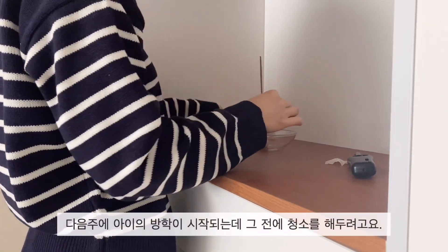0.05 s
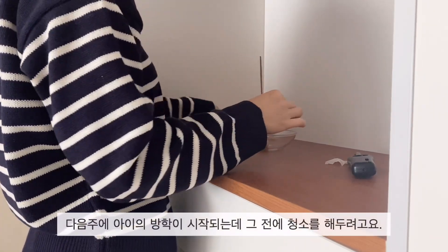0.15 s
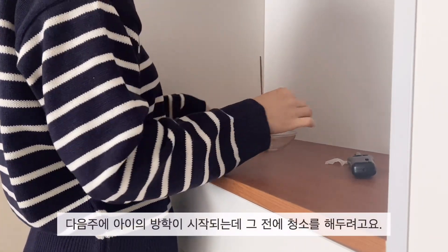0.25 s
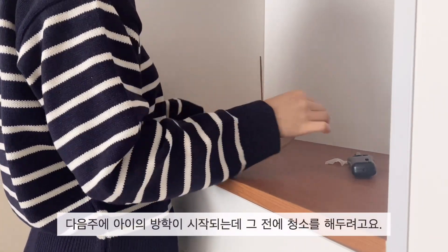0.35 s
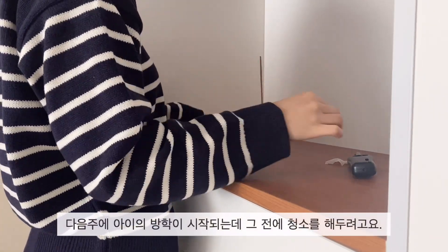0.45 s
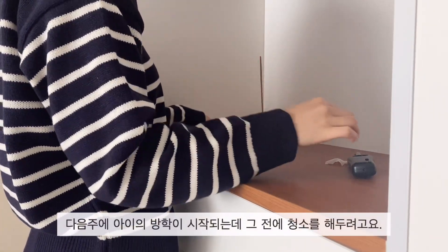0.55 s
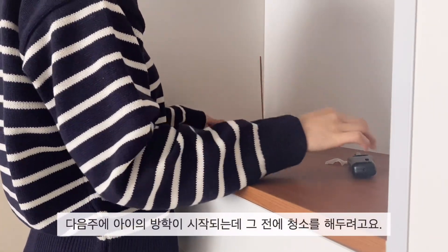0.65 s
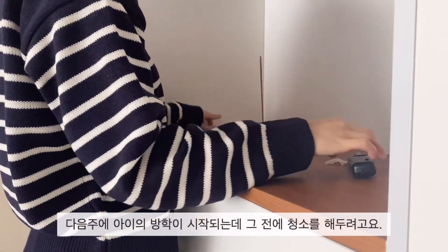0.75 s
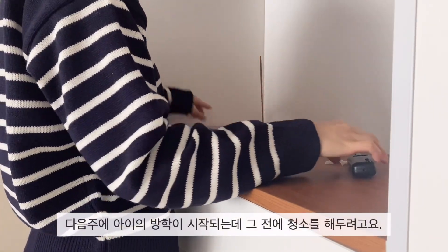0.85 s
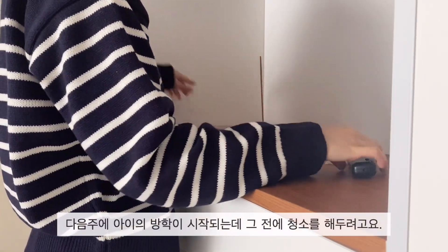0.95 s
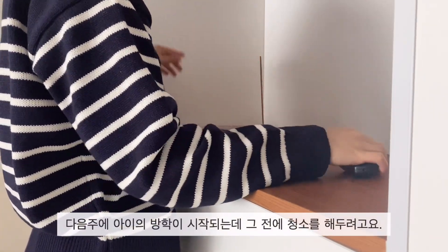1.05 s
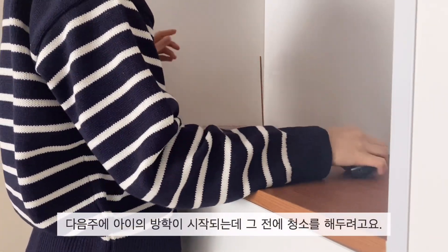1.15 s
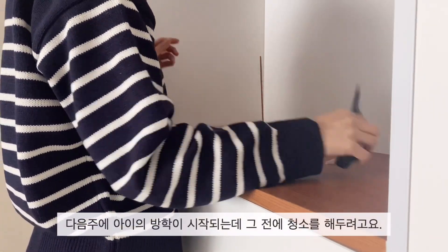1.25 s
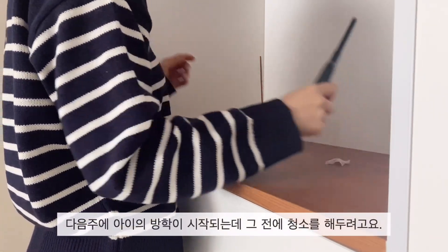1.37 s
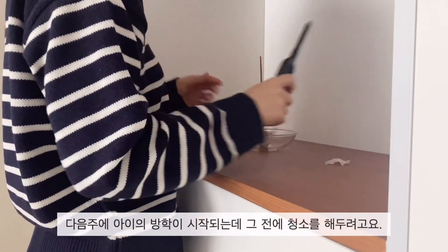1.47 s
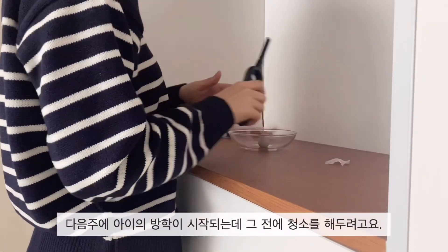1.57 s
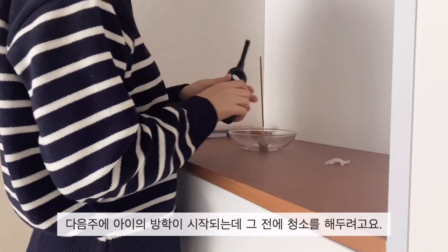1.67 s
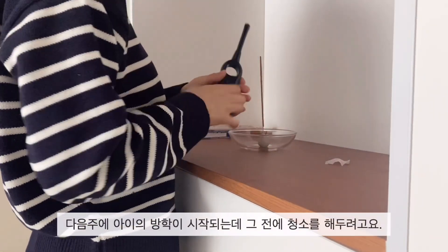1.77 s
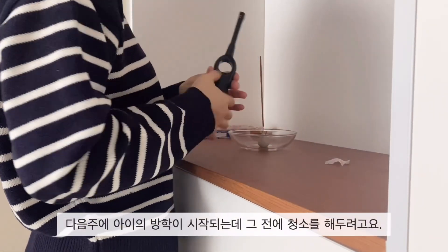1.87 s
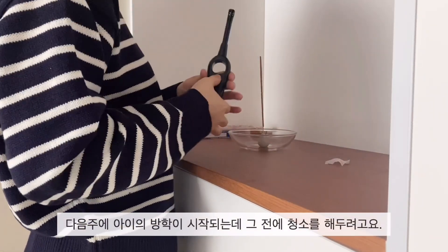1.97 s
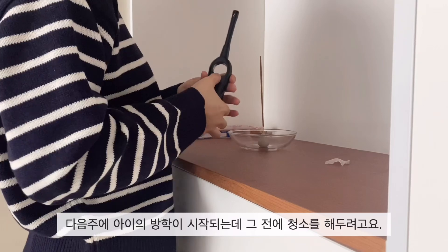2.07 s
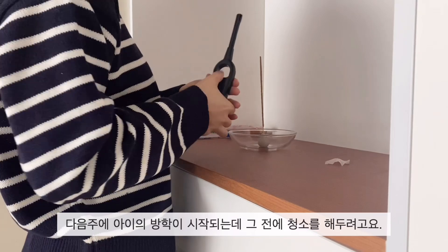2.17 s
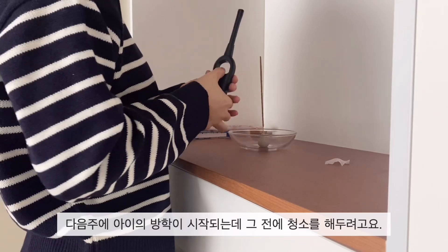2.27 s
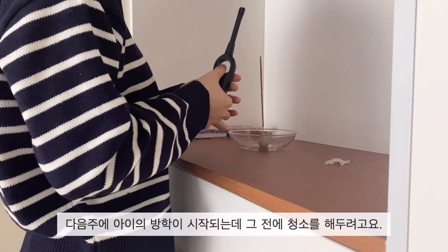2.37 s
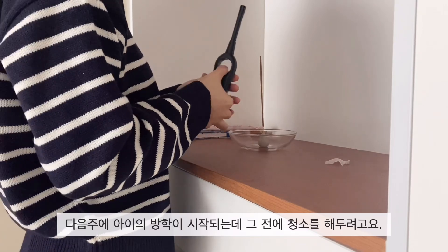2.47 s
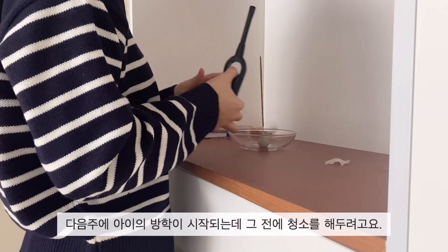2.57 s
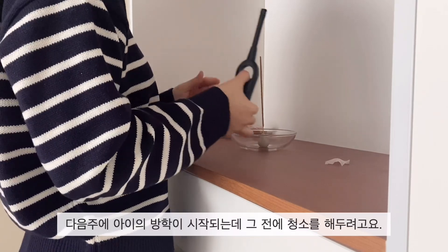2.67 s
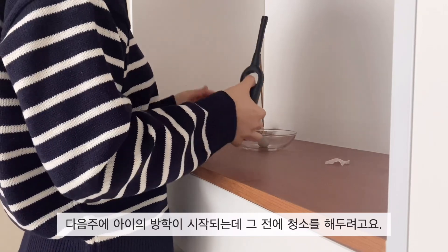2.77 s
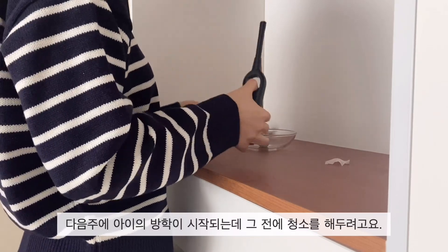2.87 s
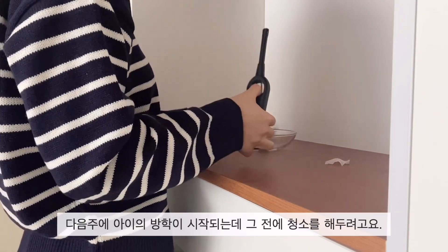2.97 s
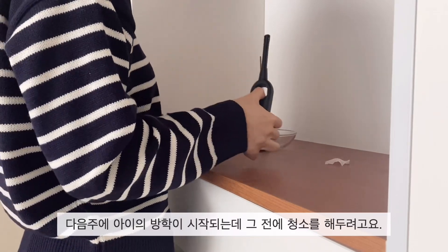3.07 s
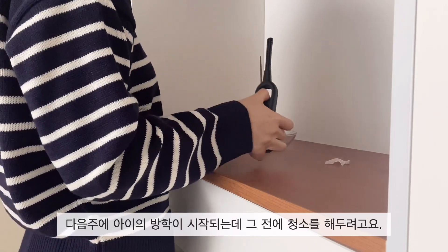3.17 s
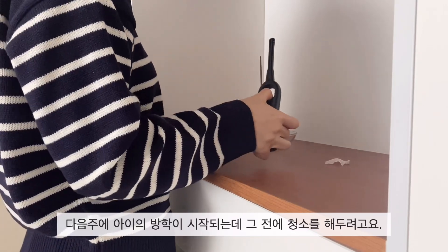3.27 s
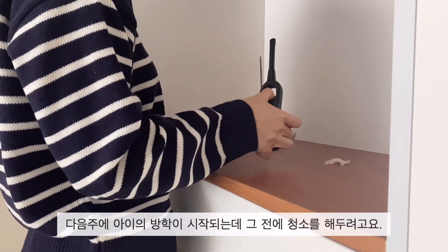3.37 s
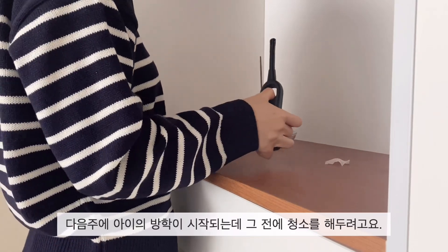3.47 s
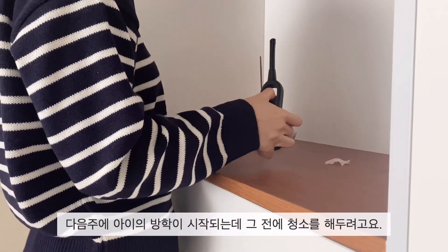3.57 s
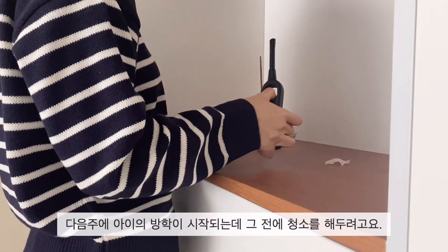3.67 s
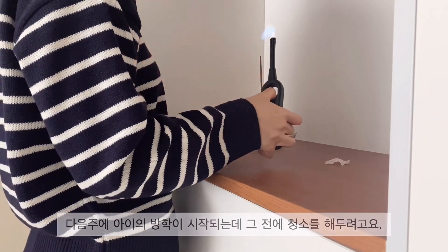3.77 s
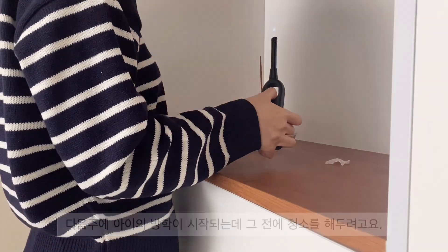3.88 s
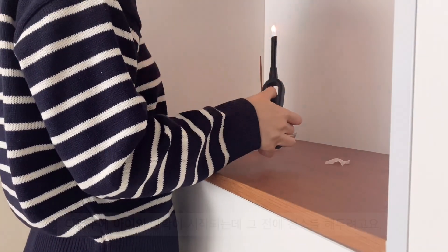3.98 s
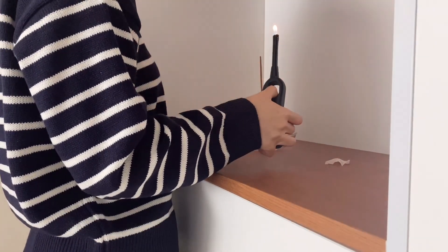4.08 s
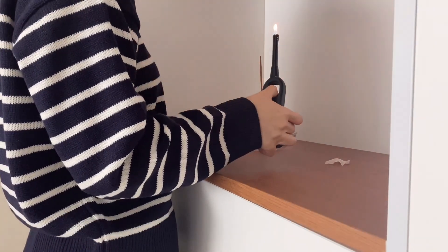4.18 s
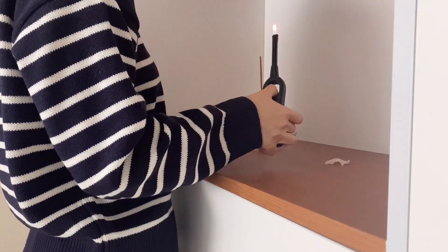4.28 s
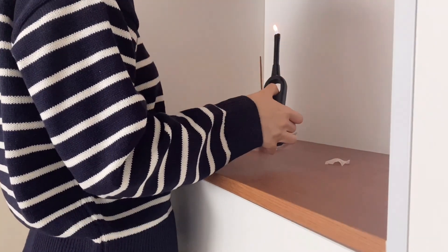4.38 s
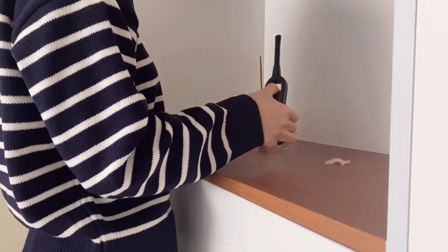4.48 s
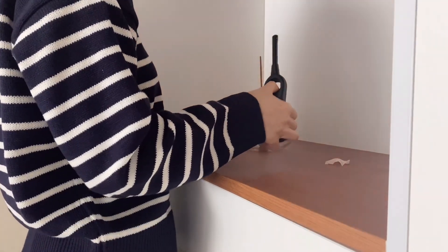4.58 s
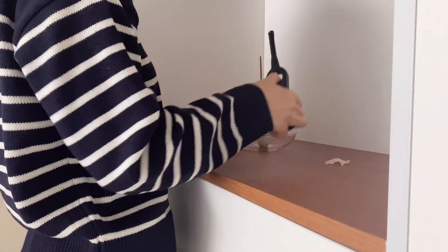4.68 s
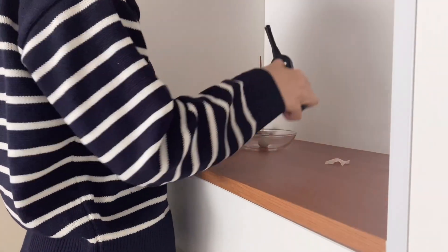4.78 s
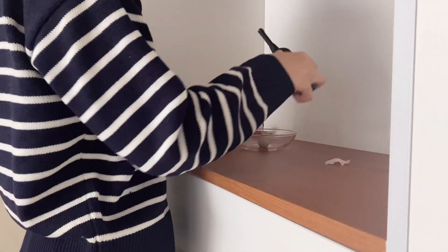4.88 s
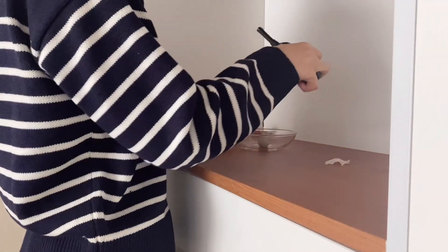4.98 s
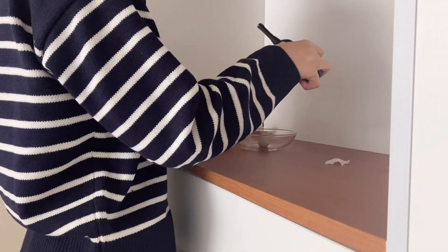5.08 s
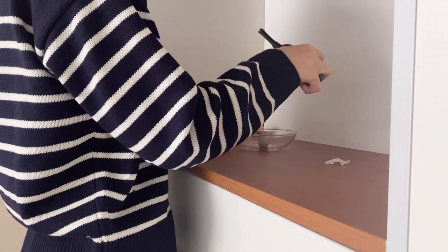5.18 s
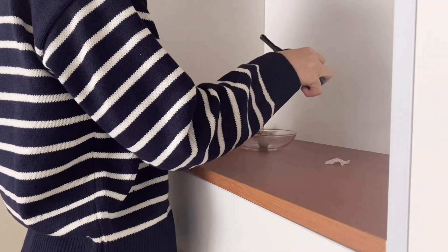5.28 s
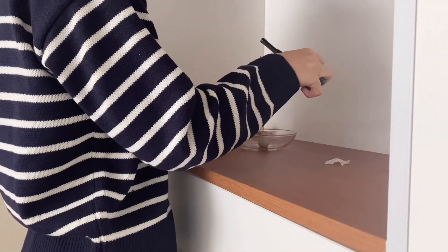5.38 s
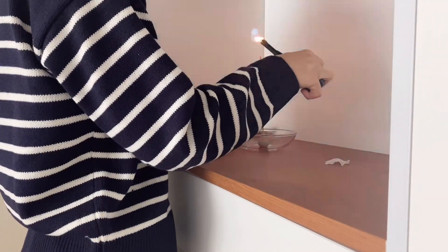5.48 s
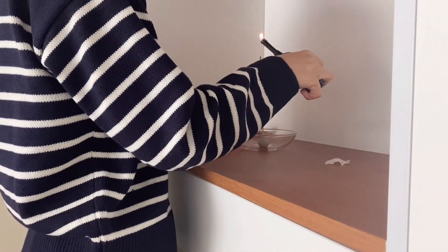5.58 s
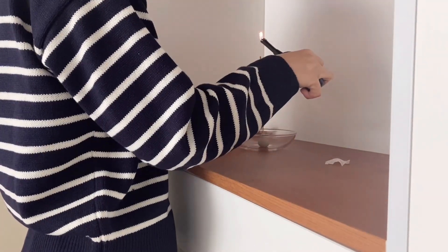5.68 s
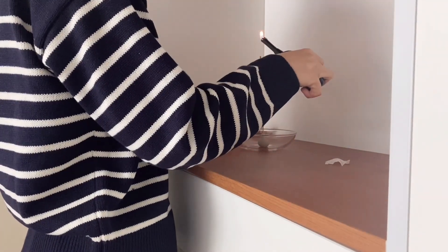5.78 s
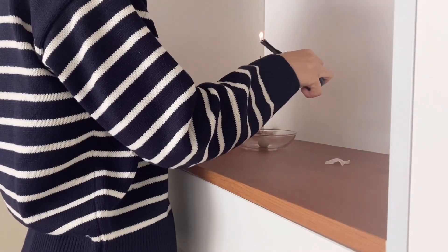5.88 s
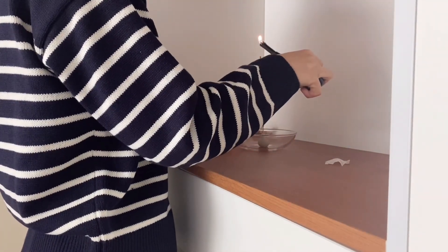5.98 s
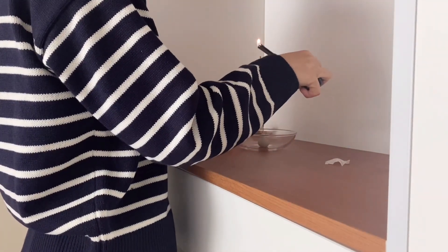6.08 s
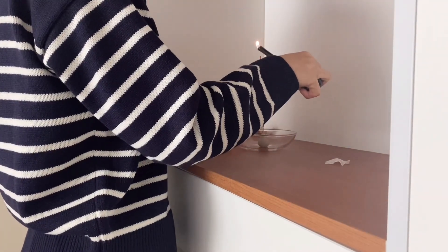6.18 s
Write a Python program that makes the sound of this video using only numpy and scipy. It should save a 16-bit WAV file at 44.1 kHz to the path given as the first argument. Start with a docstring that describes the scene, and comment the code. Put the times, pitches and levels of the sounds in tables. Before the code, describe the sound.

Close stereo pickup indoors: brief cloth movement over very quiet room air, a dull double bump, then faint skin rubbing and small plastic ticks as a utility lighter is gripped. Gritty trigger creaks grow higher and sharper until a loud bright click with a low bloom. The trigger knocks and bounces back, the shell ticks, and a shorter creak leads to another click, with the short room tail fading into faint hum.

```python
"""In a small, quiet room an appliance hums while a sleeve rustles: noise grains and crackles of fibres.
A hand bumps the shelf of an alcove, the sleeve whistles faintly, and fingers slide over a gas lighter
whose plastic shell ticks as ringing modes. The stiff trigger creaks in slips that grow higher and sharper
until the piezo hammer snaps: a ring and a broad crack. Then the trigger rattles back with bouncing knocks,
the shell ticks again, and a second creak ends in a second snap; a low boom swells after each snap."""
import sys
import numpy as np
from scipy import signal
from scipy.fft import rfft, irfft, next_fast_len
from scipy.io import wavfile
from scipy.ndimage import uniform_filter1d

SR = 44100
rng = np.random.default_rng(int(sys.argv[2]) if len(sys.argv) > 2 else 0)


def persist_wave(psi):
    """Save psi, clipped to +-1, as 16-bit WAV."""
    counts = np.round(np.clip(psi, -1, 1) * 32767).astype(np.int16)
    wavfile.write(sys.argv[1], SR, np.atleast_2d(counts).T)


N = 275228
TIME = np.arange(N) / SR
SHORT = TIME[:8192]  # time axis of one short sound


def undb(db):
    """Decibels to gain."""
    return 10 ** (np.asarray(db) / 20)


def unit(x):
    """Scale to rms 1."""
    return x / np.sqrt(np.mean(x ** 2))


def burst(x, size=176):
    """Scale so that the loudest 4 ms have rms 1."""
    return x / np.sqrt(uniform_filter1d(x ** 2, size, mode="constant").max())


def fade(t, t60):
    """Exponential decay, 60 dB down after t60 seconds."""
    return np.exp(-np.log(1000) * t / max(t60, 1e-4))


def lookup(hz, points):
    """Read (Hz, value) points on a log-frequency axis."""
    f, value = np.transpose(points)
    return np.interp(np.log(hz + 1e-9), np.log(f), value)


def noise(spectrum, count):
    """Noise of rms 1 with the given spectrum."""
    size = next_fast_len(count)
    gain = undb(lookup(np.fft.rfftfreq(size, 1 / SR), spectrum))
    shaped = irfft(rfft(rng.standard_normal(size)) * gain, size)
    return unit(shaped[:count])


def walk(rate):
    """Random drift with a spread near 1, taking a new value rate times a second."""
    knots = rng.standard_normal(4096)
    return 1.2 * np.interp(TIME * rate, np.arange(len(knots)), knots)


def add(track, s, sound):
    """Mix a sound into a track at time s, or at the start if s is negative."""
    i = max(int(s * SR), 0)
    track[i:i + len(sound)] += sound[:N - i]


def even(x, size):
    """Level out the spectrum of a decaying noise over stretches of size bins."""
    spectrum = rfft(x)
    power = uniform_filter1d(np.abs(spectrum) ** 2, size)
    return irfft(spectrum / np.sqrt(power + 1e-18))


def diffuse(a, b, spacing_s):
    """Two noises as a diffuse field at ports spacing_s of sound travel apart: most alike in the bass."""
    alike = np.sinc(2 * spacing_s * np.fft.rfftfreq(len(a), 1 / SR))
    mid = rfft(a) * np.sqrt((1 + alike) / 2)
    side = rfft(b) * np.sqrt((1 - alike) / 2)
    return irfft(np.array([mid + side, mid - side]), len(a))


def crack(t60, spectrum):
    """A blow smeared by bending waves: random phases under a smooth spectrum."""
    smear = rfft(rng.standard_normal(len(SHORT)) * fade(SHORT, t60))
    gain = undb(lookup(np.fft.rfftfreq(len(SHORT), 1 / SR), spectrum))
    # keep only the phases of the smear
    return irfft(gain * smear / np.abs(smear)) * fade(SHORT, 0.16)


# Spectrum of the room's air noise. Each row: frequency in Hz, relative level in dB per Hz.
AIR_SPECTRUM = [(20, -36), (32, -23), (60, 0.5), (120, -7), (210, -4.5), (300, -7), (420, -8), (560, -14),
                (800, -16), (1100, -27), (2000, -36.5), (4000, -44.5), (8000, -49), (16000, -62)]
# Partials of the appliance hum. Each row: centre frequency in Hz, relative level in dB, waver in Hz.
HUM_PARTIALS = [(50.9, -57.5, .5), (207, -71.5, 6.9)]


def background(air_db=-61.5, left_db=-1.1, hum_phase=0.16):
    """Low air noise of the room and an appliance hum whose partials waver in pitch and level."""
    air = undb(air_db) * diffuse(noise(AIR_SPECTRUM, N), noise(AIR_SPECTRUM, N), spacing_s=0.0012)
    hum = 0
    for hz, db, waver_hz in HUM_PARTIALS:
        phase = 2 * np.pi * np.cumsum(hz + waver_hz * walk(12)) / SR
        partial = unit(np.sin([phase, phase + hum_phase]))
        hum = hum + undb(db + 0.75 * walk(6.0)) * partial
    return (air + hum) * undb([[left_db], [-left_db]])


# Decay of the room. Each row: band centre in Hz, t60 in seconds.
ROOM_DECAY = [(150, 0.24), (700, 0.51), (1600, 0.53), (4000, 0.46), (8000, 0.28), (14000, 0.091)]


def room_tail(count=32768):
    """Late reverberation of unit energy; the midrange lingers and the top dies first."""
    t, hz = TIME[:count], np.fft.rfftfreq(count, 1 / SR)
    field = rfft(diffuse(*rng.standard_normal((2, count)), spacing_s=0.00077))
    centres = np.log([f for f, _ in ROOM_DECAY])
    tail = 0
    for share, (_, t60) in zip(np.eye(len(ROOM_DECAY)), ROOM_DECAY):
        band = irfft(field * np.interp(np.log(hz + 1), centres, share))
        tail = tail + band * fade(t, t60)
    window = (1 - np.exp(-t / .006)) * np.clip(3 - 4 * t / t[-1], 0, 1)  # soft onset and end
    return unit(even(tail, size=60) * window) / np.sqrt(count)


def place(x, spread, tail, lag_ms, early_db, early_t60, tail_db, absorb_hz=9000):
    """Close walls scatter x, which reaches the right port lag_ms late; spread rings the room, duller."""
    scatter = diffuse(*rng.standard_normal((2, len(SHORT))) ** 3, spacing_s=.0001)  # cubed: spiky echoes
    onset = np.clip(SHORT / .002 - .5, 0, 1)  # silent for the first 1 ms
    early = even(scatter * fade(SHORT, early_t60), size=12) * fade(SHORT, .3) * onset
    early = undb(early_db) * unit(early) / np.sqrt(len(SHORT))
    left, right = x + signal.fftconvolve(x[None], early, axes=1)[:, :N]
    # a shifted sinc delays by a fraction of a sample
    right = np.convolve(right, np.sinc(np.arange(-24, 25) - lag_ms * SR / 1000), "same")
    pole = np.exp(-2 * np.pi * absorb_hz / SR)
    dull = signal.lfilter([1 - pole], [1, -pole], spread)
    late = signal.fftconvolve(dull[None], tail, axes=1)[:, :N]
    return np.array([left, right]) + undb(tail_db) * late


# Low booms that build after each snap. Each row: start in seconds, centre in Hz, level in dB.
ALCOVE_BOOMS = [(3.776, 139.3, -45.5), (5.472, 115, -45.5)]


def booms(rise_s=.024):
    """The alcove booms late after each snap: a narrow hump of noise that swells and sinks."""
    out = np.zeros(N)
    swell = (SHORT / rise_s) ** 2 * np.exp(2 - 2 * SHORT / rise_s)
    for s, hz, db in ALCOVE_BOOMS:
        hump = [(hz / 4, -20), (hz / 2, -4), (hz, 0), (hz * 2, -12), (hz * 4, -35), (hz * 20, -80)]
        add(out, s, undb(db) * noise(hump, len(SHORT)) * swell)
    return out


# Soft bumps on the shelf. Each row: start in seconds, level in dB.
SHELF_BUMPS = [(1.122, -48), (1.143, -53)]
# Spectrum of a bump. Each row: frequency in Hz, relative level in dB per Hz.
BUMP_SPECTRUM = [(60, 3.5), (140, 4.5), (260, 1.5), (450, 2.5), (700, -22), (2000, -18), (6000, -58)]


def bumps():
    """The hand bumps the shelf as it takes the lighter: decaying low noise with a soft onset."""
    out = np.zeros(N)
    for s, db in SHELF_BUMPS:
        envelope = fade(SHORT, 0.25) * (1 - np.exp(-SHORT / 0.0011))
        add(out, s, undb(db) * noise(BUMP_SPECTRUM, len(SHORT)) * envelope)
    return out


def strokes(table, attack_s, t60):
    """Gain of rubbing movements: each one rises, holds for its length and dies away."""
    gain = 0
    for s, length, db in table:
        rise = np.clip((TIME - s) / attack_s, 0, 1)
        gain = gain + undb(db) * rise * fade(np.maximum(TIME - s - length, 0), t60)
    return gain


# Strokes of the sleeve as the arm reaches out. Each row: start in seconds, length in seconds,
# relative level in dB.
SLEEVE_STROKES = [(-.04, 0.14, -55), (.015, 0.012, -51.5), (.13, 0.11, -62), (.335, 0.077, -56),
                  (.44, 0.23, -58.5)]
# Fibres of the sleeve that catch and snap free. Each row: start in seconds, relative level in dB.
FIBRE_CATCHES = [(0.04, -38.5), (0.045, -39), (0.107, -38), (0.23, -54), (0.259, -48), (0.386, -38.5),
                 (0.533, -45.5), (0.612, -42), (0.723, -59.5), (1.369, -61)]
# Spectra of the dull cloth body and the sharp fibre hiss. Each row: frequency in Hz,
# relative level in dB per Hz.
CLOTH_SPECTRUM = [(200, -2.5), (450, 0), (850, 2.5), (1700, 3), (2700, -1), (4000, -6), (8000, -32)]
FIBRE_SPECTRUM = [(1500, -11.5), (2800, -3.5), (4000, -7), (6000, 3), (8200, -1.5), (10500, 3),
                  (13300, -6.5), (15000, -2), (16500, -4)]


def rustle(body_db=-2, hiss_db=-10, grain_db=3, crackle_body_db=-9, crackle_hiss_db=-4):
    """Fibres catch and let go as the sleeve moves, as grainy noise; larger catches crackle."""
    grains = unit(undb(grain_db * walk(500) + 2 * walk(38.1)))
    movement = strokes(SLEEVE_STROKES, attack_s=0.011, t60=0.16)
    cloth = undb(body_db) * noise(CLOTH_SPECTRUM, N) + undb(hiss_db) * noise(FIBRE_SPECTRUM, N)
    out = movement * grains * cloth
    for s, db in FIBRE_CATCHES:
        dull = burst(noise(CLOTH_SPECTRUM, len(SHORT)) * fade(SHORT, 0.043))
        sharp = burst(noise(FIBRE_SPECTRUM, len(SHORT)) * fade(SHORT, 0.0043))
        add(out, s, undb(db) * (undb(crackle_body_db) * dull + undb(crackle_hiss_db) * sharp))
    return out


# One sweep of the arm: its fastest moment and its duration.
SWEEP_S, SWEEP_LENGTH_S = 1.178, 0.38
# Mean pitch at the fastest moment, pitch lost at both ends, central level.
WHISTLE_HZ, WHISTLE_SAG_HZ, WHISTLE_DB = 11200, 2150, -80


def whistle(upper_ratio=1.16, upper_db=-13):
    """Fine ridges of the sleeve pass and sing a faint, unsteady arch with a weaker strand above."""
    speed = np.clip(1 - (2 * (TIME - SWEEP_S) / SWEEP_LENGTH_S) ** 2, 0, 1)
    hz = WHISTLE_HZ - WHISTLE_SAG_HZ * (1 - speed)
    phase = 2 * np.pi * np.cumsum(hz * (1 + .007 * walk(500))) / SR
    strands = np.sin(phase) + undb(upper_db) * np.sin(upper_ratio * phase)
    return np.sqrt(speed) * undb(WHISTLE_DB + 2.9 * walk(46.5)) * unit(strands)


# Fingers slide over the shelf and the shell. Each row: start in seconds, length in seconds,
# central level in dB.
FINGER_SLIDES = [(1.06, 0.22, -70.5), (1.28, 0.04, -71.5), (1.58, 0.19, -71), (1.92, 0.44, -75)]
# Spectrum of skin on a surface. Each row: frequency in Hz, relative level in dB per Hz.
SKIN_SPECTRUM = [(300, 4.5), (900, -7), (1400, -4.5), (1900, 3), (3000, -5.5), (5000, -9.5), (8500, -16.5),
                 (10500, -11.5), (13300, -17), (15000, -13), (16500, -0.5)]


def sliding():
    """Skin rubs over the surfaces: noise that flutters in level and dies away slowly."""
    movement = strokes(FINGER_SLIDES, attack_s=0.095, t60=0.85)
    flutter = undb(5.2 * walk(42.31) + 1.0 * walk(400))
    return movement * flutter * noise(SKIN_SPECTRUM, N)


# The spring inside pings when the grip shifts. Each row: start in seconds, pitch in Hz, level in dB.
SPRING_PINGS = [(2.03, 5860, -50.5), (2.244, 5780, -57), (4.466, 5070, -51.5)]


def pings(t60=0.0044):
    """A short bright ring of the trigger spring: a decaying sine."""
    out = np.zeros(N)
    for s, hz, db in SPRING_PINGS:
        ring = np.sin(2 * np.pi * hz * SHORT) * fade(SHORT, t60)
        add(out, s, undb(db) * burst(ring))
    return out


# Modes of the plastic shell, before detuning and damping. Each row: frequency in Hz,
# relative level in dB, t60 in seconds.
SHELL_MODES = [(637, -8, 0.005), (860, -8.5, 0.03), (1083, -8.5, 0.029), (1362, 2.5, 0.015),
               (1544, -0.5, 0.031), (1784, -1, 0.021), (1875, -0.5, 0.033), (2162, 3.5, 0.028),
               (2440, -8, 0.032), (2638, -2.5, 0.044), (2970, 3, 0.024), (3750, -3.5, 0.018),
               (4664, -14.5, 0.041), (6340, -1, 0.013)]
# Spectrum of the crack in a blow. Each row: frequency in Hz, relative level in dB per Hz.
CRACK_SPECTRUM = [(300, -7.5), (550, -8.5), (860, -11.5), (1150, -6.5), (2100, 5.5), (3300, 4), (4200, 5),
                  (5500, 2), (7000, 4), (9000, -0.5), (11000, 5), (13300, -12.5), (15000, 2),
                  (16500, -12.5)]


def shell(ring_hz, crack_db, crack_t60, damping, focus_db, scatter_db, contact_s):
    """One blow on the shell: the point of contact favours modes near ring_hz, with a short broad crack."""
    chance = rng.standard_normal((len(SHELL_MODES), 3))
    ring = 0
    for (hz, db, t60), (size, detune, phase) in zip(SHELL_MODES, chance):
        near = np.exp(-(np.log2(hz / ring_hz) / .22) ** 2)  # width in octaves
        swing = np.sin(2 * np.pi * (hz * (1 + .03 * detune) * SHORT + phase))
        gain = undb(db + focus_db * near + scatter_db * size)
        ring = ring + gain * swing * fade(SHORT, t60 / damping)
    contact = 1 - np.exp(-SHORT / contact_s)
    broad = burst(crack(crack_t60, CRACK_SPECTRUM) * contact)
    return burst(ring * contact) + undb(crack_db) * broad


def ticks(table, gain_db, crack_gain_db, crack_t60, damping, focus_db, contact_s):
    """Each touch of plastic rings the shell lightly, a little differently every time."""
    out = np.zeros(N)
    for s, db, ring_hz, crack_db in table:
        tick = shell(ring_hz, crack_db + crack_gain_db, crack_t60, damping, focus_db,
                     scatter_db=3, contact_s=contact_s)
        add(out, s, undb(db + gain_db) * tick)
    return out


# The shell ticks under the fingers. Each row: start in seconds, relative level in dB,
# favoured ring in Hz, relative level of the crack in dB.
GRIP_TICKS = [(1.0505, -55, 1910, -18), (1.5818, -59, 1760, -13.5), (1.6734, -40, 1920, -14),
              (2.0273, -37, 2140, -12.5), (2.2435, -38.5, 2400, -18), (4.4643, -39.5, 1570, -15),
              (4.61, -41.5, 1507, -20), (4.8379, -42, 1986, -19), (4.8778, -49, 1750, -18)]


def grips():
    """Fingers tighten on the shell and make it tick."""
    return ticks(GRIP_TICKS, gain_db=-7.5, crack_gain_db=7.0, crack_t60=0.084, damping=1.57,
                 focus_db=8.5, contact_s=0.0011)


# The trigger knocks on its way back out. Each row: start in seconds, level in dB,
# delay of the first bounce in seconds, its level against the knock in dB.
TRIGGER_RETURNS = [(4.0458, -39, .0235, -9.5), (4.1633, -40.5, 0.022, -21), (4.2240, -42, .032, -3),
                   (4.291, -43.5, .0225, -1.5)]
RELEASE_HZ, RELEASE_CRACK_DB = 1651, -11  # favoured ring, relative crack level
BOUNCE_SHRINK, BOUNCE_CRACK_DB = .75, -4  # gap ratio and crack change from bounce to bounce


def bounces(count=3):
    """Each knock of the returning trigger bounces twice, ever sooner, weaker and duller."""
    for s, db, gap_s, bounce_db in TRIGGER_RETURNS:
        for k in range(count):
            yield s, db + bounce_db * k ** 2, RELEASE_HZ, RELEASE_CRACK_DB + BOUNCE_CRACK_DB * k
            s = s + gap_s * BOUNCE_SHRINK ** k


def release():
    """The trigger knocks back against the body with short, hollow notes."""
    return ticks(bounces(), gain_db=0.0, crack_gain_db=1, crack_t60=0.038, damping=4.0,
                 focus_db=26.5, contact_s=0.0017)


# The trigger sticks and slips on its way in. Each row: start in seconds, relative level in dB.
TRIGGER_SLIPS = [(2.6244, -51.5), (2.687, -51.5), (2.7346, -44.5), (2.8171, -46), (2.861, -45.5),
                 (2.8888, -48.5), (2.919, -50), (2.968, -45.5), (3.0267, -44), (3.0616, -43),
                 (3.1044, -43.5), (3.1344, -44.5), (3.1749, -43), (3.2093, -44.5), (3.248, -48.5),
                 (3.3292, -40), (3.3616, -43.5), (3.4313, -39), (3.5421, -40.5), (3.653, -38),
                 (4.9933, -44.5), (5.026, -43), (5.0615, -42.5), (5.0843, -43.5), (5.1042, -44.5),
                 (5.227, -44), (5.3008, -40.5), (5.413, -41)]
# A slip at full load: centre of its ring, random spread in octaves, relative crack level.
SLIP_HZ, SLIP_SPREAD_OCT, SLIP_CRACK_DB = 2670, 0.12, -8
# Growth of ring and crack as the load builds.
LOAD_HZ_PER_S, LOAD_CRACK_DB_PER_S = 210, 8


def slips():
    """The thumb loads the spring until the hammer trips; the slips ring ever higher and sharper."""
    for (s, db), chance in zip(TRIGGER_SLIPS, rng.standard_normal(len(TRIGGER_SLIPS))):
        early_s = min(trip - s for trip, *_ in SNAP_PARTS if trip > s)  # time left to the snap
        ring_hz = (SLIP_HZ - LOAD_HZ_PER_S * early_s) * 2 ** (SLIP_SPREAD_OCT * chance)
        yield s, db, ring_hz, SLIP_CRACK_DB - LOAD_CRACK_DB_PER_S * early_s


def creaks():
    """The stiff trigger creaks in: every stick-slip step rings the shell."""
    return ticks(slips(), gain_db=-6, crack_gain_db=4.5, crack_t60=.04, damping=2.6,
                 focus_db=2.5, contact_s=0.0015)


# Sound that each snap sends out in all directions. Each row: start in seconds, relative level in dB.
SNAP_SPREADS = [(3.7518, -17.5), (5.4479, -19)]
# Spectrum of that sound. Each row: frequency in Hz, relative level in dB per Hz.
RADIATED_SPECTRUM = [(300, -18), (600, -20.5), (860, -9), (1130, -9), (1500, 1), (2100, -1), (3200, -5.5),
                     (4200, -2), (6000, -5.5), (11000, -5.5), (13300, -6), (15000, -2.5), (16500, -14.5)]


def radiated():
    """Summed over all directions, the peaks and dips of a snap level out into one broad crack."""
    out = np.zeros(N)
    for s, db in SNAP_SPREADS:
        add(out, s, undb(db) * burst(crack(.02, RADIATED_SPECTRUM)))
    return out


# Parts of each snap: the main blow, the low and high rings of the shell and the second contact.
# Each row: start in seconds, level in dB, favoured ring in Hz, crack over the ring in dB,
# t60 that smears the crack in seconds.
SNAP_PARTS = [(3.7533, -19, 1900, -0.5, 0.012), (3.7546, -25.5, 860, -6, 0.039),
              (3.7561, -28, 4100, -3, 0.026), (5.4475, -21, 1910, 4, 0.012),
              (5.4514, -22, 3770, 8.5, 0.0045)]


def snaps():
    """The spring hammer strikes the crystal; the shell rings low and high, damped by the tight grip."""
    out = np.zeros(N)
    for s, db, ring_hz, crack_db, crack_t60 in SNAP_PARTS:
        part = shell(ring_hz, crack_db, crack_t60, damping=3.4, focus_db=7, scatter_db=1, contact_s=.0005)
        add(out, s, undb(db) * burst(part))
    return out


def scene():
    """Lighter in the alcove, sleeve nearer and to the right, all in one room."""
    tail = room_tail()
    cloth, knocks = rustle(), release()
    fingers = sliding() + grips() + creaks() + pings() + whistle()
    sleeve = place(cloth, cloth, tail, lag_ms=-0.181, early_db=0.5, early_t60=0.043, tail_db=-6)
    hand = place(fingers, fingers, tail, lag_ms=0.024, early_db=1.0, early_t60=0.035, tail_db=-2.0)
    trigger = place(knocks, knocks, tail, lag_ms=0.03, early_db=-0.5, early_t60=0.038, tail_db=-5.0)
    hammer = place(snaps(), radiated(), tail, lag_ms=0.005, early_db=-2.0, early_t60=0.055, tail_db=-3.5)
    return background() + booms() + bumps() + sleeve + hand + trigger + hammer


TOP_HZ = 16100


def record(dry):
    """A steep elliptic low-pass cuts the top above TOP_HZ."""
    return signal.sosfilt(signal.ellip(8, .2, 70, TOP_HZ, fs=SR, output="sos"), dry)


dry = scene()
out = record(dry)
persist_wave(out)
```